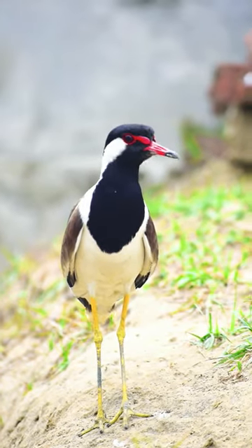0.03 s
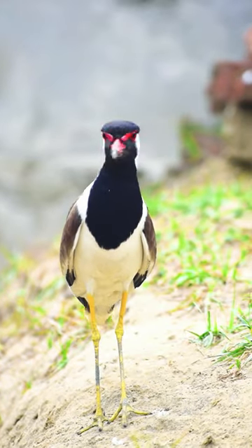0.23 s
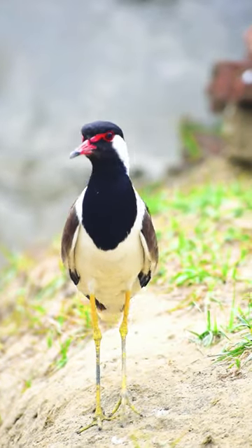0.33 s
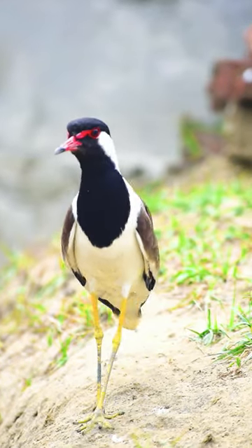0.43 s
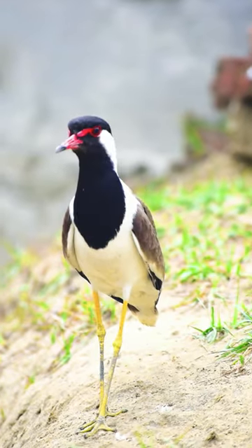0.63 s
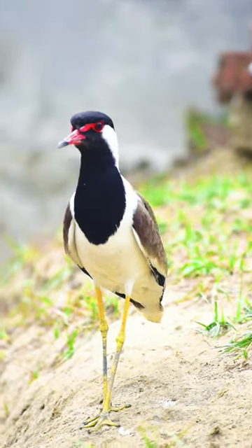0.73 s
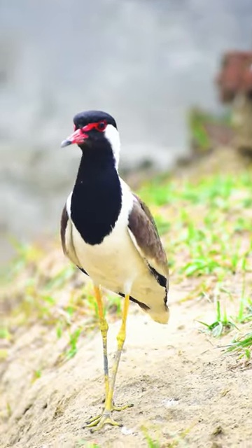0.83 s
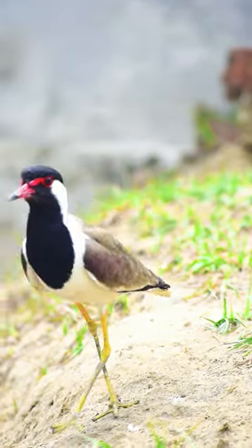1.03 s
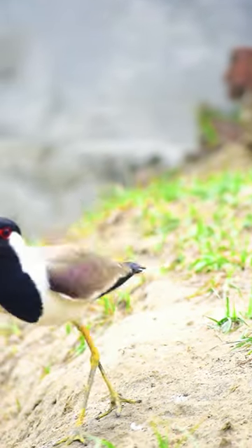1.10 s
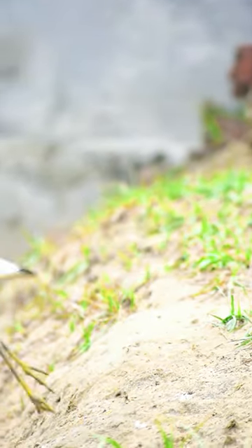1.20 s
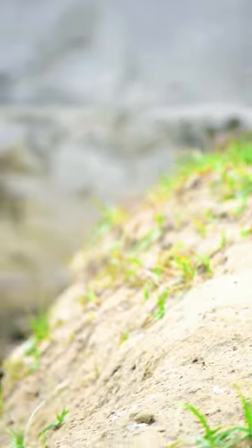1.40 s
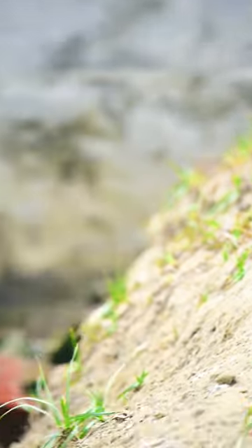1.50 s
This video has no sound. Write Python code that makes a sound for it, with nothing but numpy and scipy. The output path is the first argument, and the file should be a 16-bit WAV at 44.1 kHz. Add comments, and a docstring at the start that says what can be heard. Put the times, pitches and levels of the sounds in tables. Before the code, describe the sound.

A lapwing's short, sharp alarm cry and three quieter falling notes over faint outdoor murmur.

```python
"""A red-wattled lapwing's alarm call close by: one loud, nearly level note, then three softer, drooping ones.
Each is a bright stack of harmonics from the syrinx, shaped by the throat. The ground and nearby walls
throw it back and a thin ring lingers in the yard. Behind it lie a few faint, far peeps and a steady
outdoor murmur with a low hum of traffic."""
import sys
import numpy as np
from scipy import signal
from scipy.fft import rfft, irfft
from scipy.io import wavfile
from scipy.ndimage import uniform_filter1d

SR = 44100
rng = np.random.default_rng(int(sys.argv[2]) if len(sys.argv) > 2 else 0)


def master(y):
    """Save y as 16-bit WAV."""
    cut = np.clip(np.atleast_2d(y).T, -1, 1)
    pcm = np.round(cut * 32767)  # scale
    wavfile.write(sys.argv[1], SR, pcm.astype(np.int16))


N = 68355
SIDES = np.array([[1], [-1]])  # left, right


def loud_note(t):
    """First cry, bill wide open: hard, nearly level, brightest at a small jump in pitch."""
    # contour: time_s, pitch_hz, gain_db, tilt_db_per_octave
    contour = [(0.225, 1324, -0.5, -0.5), (0.231, 1327, -1, -3), (0.234, 1340, 1, -4.5),
               (0.239, 1351, 4, -4), (0.241, 1374, -2, 3.5), (0.247, 1356, 1.5, -1),
               (0.255, 1357, -0.5, -1), (0.26, 1310, 8.5, -3.5)]
    # throat response: freq_hz, gain_db
    throat = [(1350, -22.5), (2700, -8.5), (4050, -3), (5400, -13.5), (6750, -11), (8100, -15.5),
              (9450, -22), (10800, -21.5), (12150, -22), (13500, -35.5), (14900, -29.5)]
    # stereo image: freq_hz, left_over_right_db, left_lead_rad
    pan = [(1350, 2.5, -.13), (2700, -2, .15), (4050, -2, .07), (5400, -5, .2), (6750, 4, -.1),
           (8100, 2, -.15), (10800, -2, .1), (15000, 1, .3)]
    start_s, level_db = .2227, -22.5
    pitch_hz, gain_db, tilt_db = curves(t, contour)
    env = undb(level_db + gain_db) * envelope(t - start_s, length_s=.032, release_s=.004)
    return syrinx(t, pitch_hz, env, throat, pan, tilt_db)


def drooping_notes(t):
    """Softer cries that scoop up, then fall and dull. Returns direct sound and feed to the yard."""
    # notes: start_s, length_s, top_hz, level_db, tilt_db_per_octave
    notes = [(0.7862, 0.03, 1349, -39.5, -2), (1.1198, 0.032, 1376, -41, -1.5),
             (1.5428, .04, 1372, -43, -4.5)]
    # contour of each note: age_s, below_top_hz, gain_db, tilt_db_per_octave
    contour = [(0, 19, 1, 0), (.011, 1, 2.5, 0), (.021, 20.7, 2.5, 2), (0.032, 107, 2.5, -5.5),
               (.038, 180, 4, -5), (0.049, 294.6, -4, -18.5)]
    # throat response: freq_hz, gain_db
    throat = [(1050, -22), (1350, -14.5), (2150, -10.5), (2450, -6), (2720, -3), (3400, -1), (3800, -0.5),
              (4100, -4), (4700, -13), (5400, -17.5), (6000, -20.5), (6750, -20), (7400, -37), (8100, -30),
              (9500, -38.5), (15000, -47)]
    # stereo image: freq_hz, left_over_right_db, left_lead_rad
    pan = [(1350, 0.74, 0), (2650, 0.46, 0.22), (4050, -0.015, -0.31), (5400, .4, -0.044),
           (6750, 2.8, 0.17), (8100, -2, 0)]
    # brief dips of the third harmonic: time_s, width_s, gain_db
    falters = [(0.807, 0.006, -11.5), (1.131, 0.0055, -21)]
    throw_db, throw_fade_s, throw_db_per_octave = 3, .044, 2
    direct = thrown = 0
    for start_s, length_s, top_hz, level_db, note_tilt_db in notes:
        age_s = t - start_s
        drop_hz, gain_db, tilt_db = curves(age_s, contour)
        pitch_hz = top_hz - drop_hz
        env = undb(level_db + gain_db) * envelope(age_s, length_s, release_s=.022)
        direct += syrinx(t, pitch_hz, env, throat, pan, tilt_db + note_tilt_db, falters)
        # the open-billed start carries farthest
        gape = 1 / (1 + (np.maximum(age_s, 0) / throw_fade_s) ** 4)
        throw_env = env * gape * undb(throw_db)
        thrown += syrinx(t, pitch_hz, throw_env, throat, pan, tilt_db + throw_db_per_octave)
    return direct, thrown


def syrinx(t, pitch_hz, env, throat, pan, tilt_db, falters=()):
    """Twelve harmonics of an unsteady pitch sweep the throat's resonances; air rasps once a cycle."""
    jitter, rasp_db, shimmer_db_per_octave = .00348, -29, 1.05
    dispersion_rad, wander_rad = .25, .051
    phase = 2 * np.pi * np.cumsum(pitch_hz * (1 + jitter * walk(rate_hz=900.3))) / SR
    breath = noise([(200, -48), (700, -37.5)] + list(throat))
    rasp = undb(rasp_db) * breath * (1 + np.cos(phase)) * env
    out = np.array([rasp, rasp])
    on = env > undb(-80)
    falter_db = sum(db * np.exp(-((t[on] - time_s) / width_s) ** 2) for time_s, width_s, db in falters)
    for k in range(1, 13):
        hz = k * pitch_hz[on]
        shimmer_db = shimmer_db_per_octave * np.log2(k) * walk(rate_hz=148.43)[on]
        db = at(throat, hz) + tilt_db[on] * np.log2(max(k / 2, 1)) + shimmer_db
        db = db + SIDES * at(pan, hz) / 2 + falter_db * (k == 3)
        wander = wander_rad * k * walk(rate_hz=70.2)[on]
        lead = SIDES * (at(pan, hz, column=2) / 2 + wander)
        smear = dispersion_rad * k ** 2  # the throat smears each pulse
        out[:, on] += np.sqrt(2) * env[on] * undb(db) * np.cos(k * phase[on] + lead - smear)
    return out


def faint_tick(t):
    """Tiny noise tick just before the first cry."""
    # spectrum: freq_hz, gain_db
    spectrum = [(1000, -5.5), (3500, -0.5), (6000, -17), (14000, -27)]
    start_s, level_db, decay_s = .209, -51, .0081
    return undb(level_db) * noise(spectrum) * (t > start_s) * np.exp(-np.abs(t - start_s) / decay_s)


def reflections(voice):
    """Distinct echoes off the ground and nearby walls, each from its own direction."""
    # echoes: delay_s, gain_db, left_over_right_db, right_lag_s
    echoes = [(.0072, -17.5, 1, .00002), (.0112, -23.5, 6, -.00003), (0.0343, -17.5, -0.5, -.00001),
              (0.0374, -20.5, -4.5, -.00002)]
    mono = voice.mean(axis=0)
    out = 0
    for delay_s, gain_db, pan_db, lag_s in echoes:
        left = undb(pan_db / 2) * delayed(mono, delay_s)
        right = undb(-pan_db / 2) * delayed(mono, delay_s + lag_s)
        out += undb(gain_db) * np.array([left, right])
    return out


def yard(voice, t):
    """Quick scatter and a faint long ring, shorter and wider in the treble."""
    # ring bands: freq_hz, late_t60_s, gain_db
    bands = [(1340, 0.91, 2), (2700, 1.0, 0), (3930, 0.99, -1), (5330, 1, 5.5), (7000, 0.73, 3),
             (11000, .5, 2), (15000, 0.14, -0.5)]
    early_t60_s, gap_s, late_db, tail_db, side_per_khz = .26, .012, -14, -14.5, .053
    hz = np.fft.rfftfreq(N, 1 / SR)
    mid, side = rfft(rng.standard_normal((2, N)))
    width = np.clip(side_per_khz * hz / 1000, 0, 1)
    scatter = mid + width * side * SIDES
    tail = 0
    for (_, t60_s, gain_db), share in zip(bands, np.eye(len(bands))):
        weight = np.interp(hz, np.array(bands)[:, 0], share)
        decay = undb(-60 * t / early_t60_s) + undb(late_db - 60 * t / t60_s)
        tail += undb(gain_db) * irfft(scatter * weight, N) * decay
    tail *= np.clip(t / gap_s - 1, 0, 1)
    tail *= undb(tail_db) / np.sqrt(np.sum(tail.mean(axis=0) ** 2))
    return signal.fftconvolve(voice.mean(axis=0)[None], tail, axes=1)[:, :N]


def far_peeps(t):
    """Faint, nearly pure notes from far off."""
    # peeps: start_s, length_s, pitch_hz, level_db
    peeps = [(0.527, 0.038, 2727, -58), (1.0, 0.016, 2574, -62.5), (1.328, 0.051, 2630, -65)]
    jitter = .00814
    out = 0
    for start_s, length_s, pitch_hz, level_db in peeps:
        phase = 2 * np.pi * np.cumsum(pitch_hz * (1 + jitter * walk(rate_hz=200))) / SR
        env = np.sin(np.pi * np.clip((t - start_s) / length_s, 0, 1))
        out += np.sqrt(2) * undb(level_db) * env * np.sin(phase)
    return out


def outdoors():
    """Distant murmur, low traffic hum and thin hiss, almost alike on both sides."""
    # spectrum: freq_hz, relative_density_db
    spectrum = [(20, -5.5), (45, -9), (80, -8.5), (120, 0.5), (155, -8.5), (200, -8), (300, -13),
                (450, -13), (680, -7), (1100, -5.5), (1600, -7.5), (2200, -13), (2700, -12), (4000, -19),
                (5500, -22), (7000, -29), (8200, -18), (9300, -34.5), (15000, -35.5)]
    # stereo width: freq_hz, side_over_mid_db
    width = [(25, -12), (60, -10), (120, -20.5), (400, -24.5), (2000, -11.5), (6000, -10), (14000, -3.5)]
    level_db, waver_db = -63, 1.17
    mid, side = noise(spectrum), colour(noise(spectrum), width)
    return undb(level_db + waver_db * walk(rate_hz=8.3)) * (mid + side * SIDES)


def undb(db):
    """Decibels to gain."""
    return 10 ** (np.asarray(db) / 20)


def at(table, hz, column=1):
    """One table column, interpolated over log frequency."""
    columns = np.array(table, float).T
    return np.interp(np.log(np.maximum(hz, 1)), np.log(columns[0]), columns[column])


def curves(t, table):
    """All value columns of a table, interpolated over time."""
    time_s, *columns = np.array(table, float).T
    return [np.interp(t, time_s, column) for column in columns]


def colour(x, table):
    """Filter by (freq_hz, gain_db) points."""
    return irfft(rfft(x) * undb(at(table, np.fft.rfftfreq(N, 1 / SR))), N)


def noise(spectrum):
    """Coloured noise, rms 1."""
    x = colour(rng.standard_normal(N), spectrum)
    return x / x.std()


def walk(rate_hz):
    """Smooth random drift, standard deviation 1."""
    hold = max(int(SR / rate_hz), 1)
    drift = uniform_filter1d(rng.standard_normal(N)[np.arange(N) // hold], hold)
    return drift / drift.std()


def envelope(age_s, length_s, release_s, attack_s=.001):
    """Abrupt attack, hold, Gaussian release."""
    attack = 1 - np.exp(-np.maximum(age_s, 0) / attack_s)
    return attack * np.exp(-(np.maximum(age_s - length_s, 0) / release_s) ** 2)


def delayed(x, delay_s):
    """Fractional delay by FFT."""
    size = 2 * N
    hz = np.fft.rfftfreq(size, 1 / SR)
    return irfft(rfft(x, size) * np.exp(-2j * np.pi * hz * delay_s), size)[:N]


def scene():
    """The bird in its yard over the background."""
    t = np.arange(N) / SR
    soft_echo_db = 5  # the softer notes reach the walls more strongly
    loud = loud_note(t)
    soft, thrown = drooping_notes(t)
    space = reflections(loud + undb(soft_echo_db) * soft) + yard(loud + thrown, t)
    return loud + soft + space + faint_tick(t) + far_peeps(t) + outdoors()


def record(dry):
    """Steep low-pass on the top treble."""
    cutoff_hz = 15500
    return signal.sosfilt(signal.ellip(10, .2, 80, cutoff_hz, fs=SR, output="sos"), dry)


dry = scene()
out = record(dry)
master(out)
```